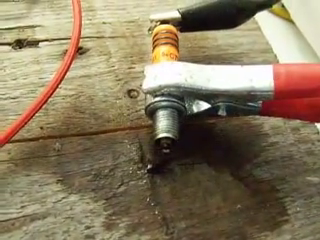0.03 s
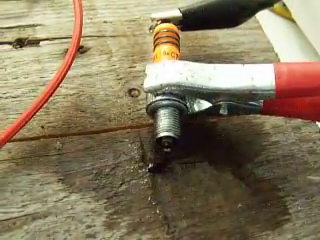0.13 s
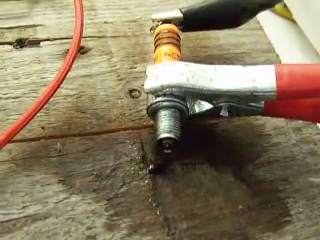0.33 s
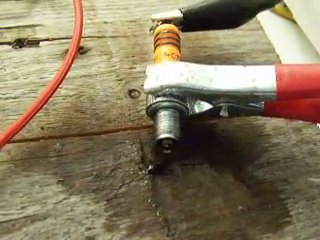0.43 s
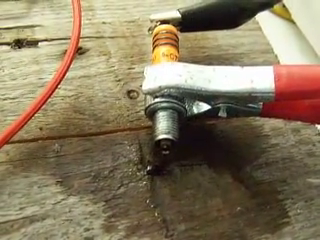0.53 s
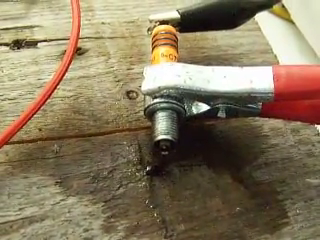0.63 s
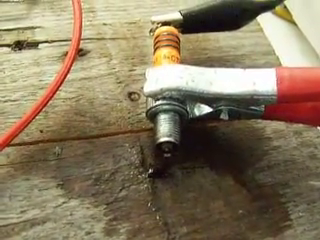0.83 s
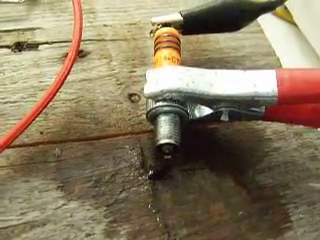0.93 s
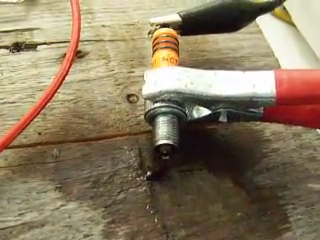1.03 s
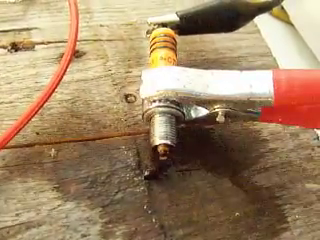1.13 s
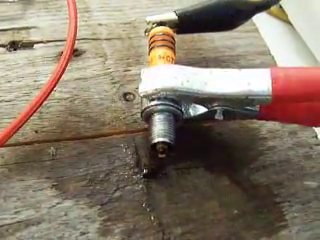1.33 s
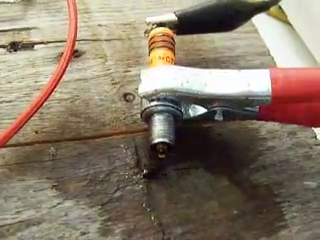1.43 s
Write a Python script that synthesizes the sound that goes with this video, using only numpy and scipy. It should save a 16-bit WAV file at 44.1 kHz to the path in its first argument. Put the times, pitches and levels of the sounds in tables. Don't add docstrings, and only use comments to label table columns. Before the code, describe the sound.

Electric spark snaps from a plug, after a hard switch knock on a wooden bench, over hiss

```python
import sys
import numpy as np
from scipy import signal
from scipy.fft import rfft, irfft
from scipy.io import wavfile

SR = 44100
rng = np.random.default_rng(int(sys.argv[2]) if len(sys.argv) > 2 else 0)


def store_pcm(level_fs):
    pcm = np.round(np.clip(level_fs, -1, 1) * 32767).astype(np.int16)
    wavfile.write(sys.argv[1], SR, np.atleast_2d(pcm).T)


def undo_db(level):
    steps = np.asarray(level, float) / 20
    return 10 ** steps


N = 66150


def times():
    return np.arange(N) / SR


def at_hz(points, hz):
    p = np.array(points)
    return np.interp(np.log(np.maximum(hz, 1)), np.log(p[:, 0]), p[:, 1])


def rms_one(x):
    return x / np.sqrt(np.mean(x ** 2) + 1e-20)


def drift(rate_hz):
    r = np.exp(-80 * np.pi * rate_hz / SR)
    noise = rng.standard_normal(N // 40 + 2002)
    slow = signal.lfilter([1], [1, -2 * r, r * r], noise)[2000:]
    return np.interp(np.arange(N) / 40, np.arange(len(slow)), rms_one(slow))


def decay(since, t60):
    return (since >= 0) * undo_db(-60 * np.maximum(since, 0) / t60)


def band_pass(order, low_hz, high_hz, x):
    return signal.sosfilt(signal.butter(order, [low_hz, high_hz], "band", fs=SR, output="sos"), x)


# (frequency [Hz], likeness [-1 to 1])
LIKENESS = [(60, 0.82), (150, 0.91), (380, 0.86), (970, 0.65), (2460, -0.39), (6230, -0.14)]


def stereo_noise(db_of_hz):
    hz = np.fft.rfftfreq(N, 1 / SR)
    mid, side = rfft(rng.standard_normal((2, N)))
    alike = np.clip(at_hz(LIKENESS, hz), 0, 1)
    opposite = np.array([[1], [-1]])
    pair = np.sqrt(1 + alike) * mid + np.sqrt(1 - alike) * side * opposite
    return irfft(pair * undo_db(db_of_hz(hz)), N) / np.sqrt(2)


def tilted_noise(slope_db, low_hz, high_hz):
    return stereo_noise(lambda hz: slope_db * np.log2(np.clip(hz, low_hz, high_hz) / 4000))


# (time [s], peak level [dB], room tail level [dB], tail tilt [dB per octave],
#             delay of low tones behind high ones [ms per kHz])
SNAPS = [
    (0.2238, -7.5, -38, -2.5, 0.051),
    (0.4211, -5, -44.5, 1.5, 0.404),
    (0.9940, 2.5, -40.5, 12.5, 0.459),
]
# (frequency [Hz], left level [dB], right level [dB], fade by 60 dB [s])
KNOCK_RING = [(786, -13.5, -24, 0.016), (940, -10, -21, 0.04), (1442, -9.5, -19.5, 0.039),
              (1802, -20.5, -16, 0.055), (2073, -17, -18.5, 0.012), (2580, -14.5, -7, 0.019),
              (3185, -14.5, -16.5, 0.0095), (3570, -20, -19, 0.034), (4608, -7.5, -9.5, 0.013),
              (5170, -10.5, 3.5, 0.0077), (5800, -15, -21, 0.019), (6090, 1, -21, 0.0081),
              (7020, -17, -17.5, 0.0031), (7800, -16, -6, .008)]
SPARK_WEAK = [(1540, -30.5, -30.5, 0.015), (2500, -30.5, -19, .008), (3880, -24, -14.5, 0.0067),
              (4340, -20, -24, 0.012), (4676, -29, -5.5, 0.011), (5335, -1, -13.5, 0.0044),
              (6130, 4, -13, 0.0079), (7800, -30, -39, .008), (7810, -23, -45, .008)]
SPARK_STRONG = [(1410, -21, -44, 0.009), (2200, -36, -14, 0.016), (2647, -21.5, -9, 0.011),
                (3917, -16, -3.5, 0.0069), (4590, -4.5, 3.5, 0.0054), (5240, -26, 1.5, 0.011),
                (5486, 6.5, -29, 0.011), (6150, 7, -15, 0.0086), (6910, -10, -18, .007),
                (8700, -55, -57, .007)]
RISE_S, CREST_S, HOLD_S = 0.00039, 0.0006, 0.0023
SPREAD_CENTRE_HZ, LOUDEST_SPARK_DB = 6100, -1.6


def snaps():
    out = np.zeros((2, N))
    for (s, db, _, _, spread), modes in zip(SNAPS, (KNOCK_RING, SPARK_WEAK, SPARK_STRONG)):
        since = times() - s
        rise = 1 - np.exp(-(np.maximum(since, 0) / RISE_S) ** 2)
        snap = 0
        for hz, left_db, right_db, t60 in modes:
            cycles = hz * (since - CREST_S) + spread / 2 * ((hz - SPREAD_CENTRE_HZ) / 1000) ** 2
            fade = decay(np.maximum(since - HOLD_S, 0), t60)
            wave = np.cos(2 * np.pi * cycles) * fade * rise
            snap = snap + undo_db(np.array([[left_db], [right_db]])) * wave
        out += undo_db(min(db, LOUDEST_SPARK_DB)) * snap / np.abs(snap).max()
    return out


EARLY_DB, EARLY_T60_S = 16, 0.038
ROOM_DB, LATE_T60_S = -5, 0.43
WALL_DB, WALL_TILT_DB, WALL_S, WALL_RISE_S = -1.3, 6, 0.024, 0.0064


def tails():
    out = 0
    for s, _, tail_db, tilt_db, _ in SNAPS:
        since = times() - s
        late = np.maximum(since - WALL_S, 0)
        early = undo_db(EARLY_DB) * decay(since - 0.001, EARLY_T60_S)
        near = early + undo_db(ROOM_DB) * decay(since, LATE_T60_S)
        wall = undo_db(WALL_DB) * (1 - np.exp(-late / WALL_RISE_S)) * decay(late, LATE_T60_S)
        for shape, slope_db in ((near, tilt_db), (wall, WALL_TILT_DB)):
            out = out + undo_db(tail_db) * shape * tilted_noise(slope_db, 150, 5000)
    return out


# (frequency [Hz], level [dB], fade by 60 dB [s])
BENCH = [(79.7, -0.5, 0.35), (103.2, -10, 0.41), (154.7, -12, 0.65), (167.6, -9, 0.76), (212.4, -8.5, 0.44),
         (237.3, -14, 0.86), (371.3, -14.5, .32), (439.6, -20, .5), (469, -18, 0.37), (560, -25, .5),
         (803.5, -24, 0.3), (829.5, -30.5, 0.68), (958, -27.5, 0.11)]
# (time [s], frequency [Hz], level [dB], fade by 60 dB [s])
BUMPS = [
    (.997, 325, -34, 0.058),
    (1.008, 58, -29.5, 0.078),
    (1.068, 52, -36, 0.18),
    (1.216, 48, -32.5, 0.12),
]
BENCH_S, BENCH_DB, BENCH_RISE_S = 0.2268, -21, 0.0022
BENCH_RING_SCALE, BENCH_PAN_DB = 1.35, 0.9
BOOM_DB, BOOM_T60_S, BOOM_LOW_HZ, BOOM_HIGH_HZ = -33.5, 0.96, 131, 271
RATTLE_DB, RATTLE_T60_S, RATTLE_LOW_HZ, RATTLE_HIGH_HZ = -45.5, 0.92, 280, 1270


def bench():
    since = times() - BENCH_S
    ring = 0
    for hz, db, t60 in BENCH:
        fade = decay(since, t60 * BENCH_RING_SCALE)
        ring = ring + undo_db(BENCH_DB + db) * np.sin(2 * np.pi * hz * since) * fade

    boom = rms_one(band_pass(2, BOOM_LOW_HZ, BOOM_HIGH_HZ, stereo_noise(np.zeros_like)))
    boom = boom * undo_db(BOOM_DB) * decay(since, BOOM_T60_S)
    rattle = rms_one(band_pass(1, RATTLE_LOW_HZ, RATTLE_HIGH_HZ, stereo_noise(np.zeros_like)))
    rattle = rattle * undo_db(RATTLE_DB) * decay(since, RATTLE_T60_S)

    swell = 1 - np.exp(-np.maximum(since, 0) / BENCH_RISE_S)
    out = (ring + boom + rattle) * swell
    for s, hz, db, t60 in BUMPS:
        after = times() - s
        out = out + undo_db(db) * np.sin(2 * np.pi * hz * after) * decay(after, t60)
    return out * undo_db(np.array([[BENCH_PAN_DB], [-BENCH_PAN_DB]]))


# (time [s], length [s], level [dB])
RUSTLES = [
    (.53, .02, -83),
    (.94, 0.069, -52.5),
    (1.30, 0.027, -52),
    (1.39, 0.014, -73.5),
    (1.465, .02, -55),
    (1.495, 0.012, -47),
]


def rustles():
    shape = sum(undo_db(db) * np.exp(-(2 * (times() - s) / length) ** 2) for s, length, db in RUSTLES)
    return shape * tilted_noise(4.5, 300, 4000)


# (time [s], frequency [Hz], level [dB])
CREAK = [
    (.76, 900, -75),
    (.80, 960, -61),
    (.845, 1060, -60),
    (.89, 1020, -61),
    (.915, 990, -75),
]


def creak():
    s, hz, db = np.transpose(CREAK)
    pitch = np.interp(times(), s, hz) * (1 + 0.024 * drift(61.7))
    level = undo_db(np.interp(times(), s, db, left=-120, right=-120)) * drift(45)
    return level * np.sin(2 * np.pi * np.cumsum(pitch) / SR)


# (frequency [Hz], level [dB per Hz])
AIR = [(22, -6.5), (46, 1), (75, -4.5), (250, -15), (900, -23.5), (1800, -29.5), (4000, -33.5),
       (8000, -31.5)]
AIR_DB, AIR_PATCH_DB, AIR_PATCH_RATE_HZ = -44, 0.6, 12


def air():
    swell = undo_db(AIR_PATCH_DB * drift(AIR_PATCH_RATE_HZ))
    return undo_db(AIR_DB) * swell * rms_one(stereo_noise(lambda hz: at_hz(AIR, hz)))


# (resonance [Hz], width [Hz], lift [dB], roll-off [Hz])
PORTS = [(5834, 490, 14, 6800), (5095, 970, 15.5, 4700)]


def ports(x):
    out = []
    for side, (hz, width_hz, lift_db, roll_hz) in zip(x, PORTS):
        r = np.exp(-np.pi * width_hz / SR)
        feed = np.array([1, 0, -1]) * (1 - r * r) / 2
        peak = signal.lfilter(feed, [1, -2 * r * np.cos(2 * np.pi * hz / SR), r * r], side)
        lifted = side + (undo_db(lift_db) - 1) * peak
        out.append(signal.sosfilt(signal.butter(4, roll_hz, fs=SR, output="sos"), lifted))
    return np.array(out)


def scene():
    return ports(air() + tails() + rustles() + bench() + creak()) + snaps()


def top_cut(x):
    return signal.sosfilt(signal.butter(12, 21000, fs=SR, output="sos"), x)


CUTOFF_HZ, PREAMP_CUT_HZ, CEILING = 8350, 15800, 1.0
GAIN_DROP_DB, GAIN_START_S, GAIN_FALL_TIME_S = 13, 0.2305, 0.08


def record(dry):
    x = signal.sosfilt(signal.cheby2(10, 50, CUTOFF_HZ * 1.06, fs=SR, output="sos"), dry)
    extra_gain = np.exp(-np.maximum(times() - GAIN_START_S, 0) / GAIN_FALL_TIME_S)
    x = np.clip(x * undo_db(GAIN_DROP_DB * extra_gain), -CEILING, CEILING)
    x = signal.sosfilt(signal.butter(8, PREAMP_CUT_HZ, fs=SR, output="sos"), x)
    return top_cut(x)


dry = scene()
out = record(dry)
store_pcm(out)
```